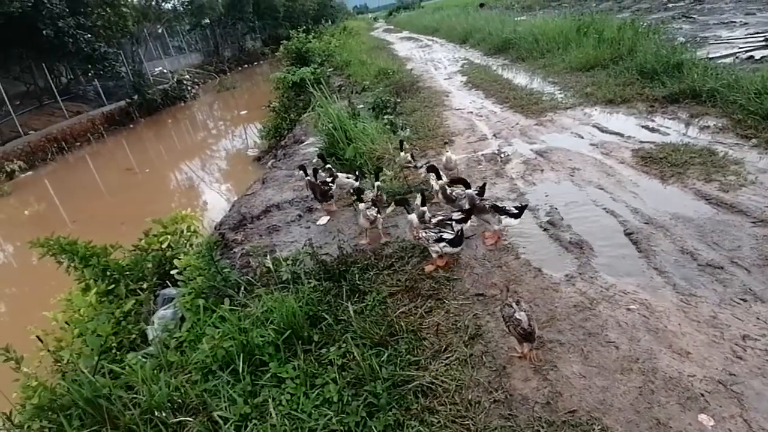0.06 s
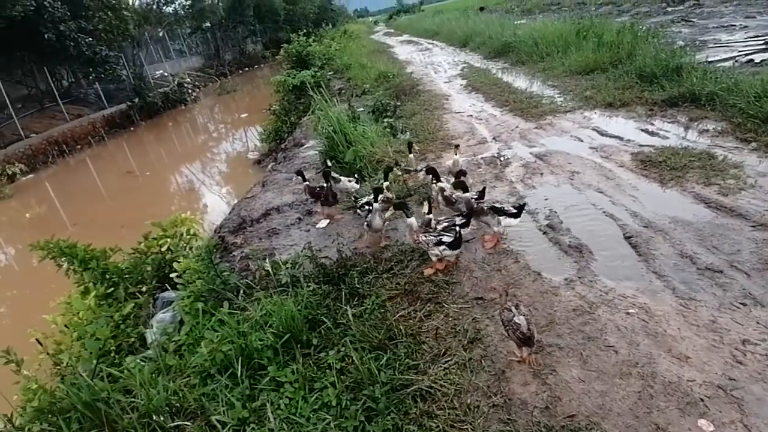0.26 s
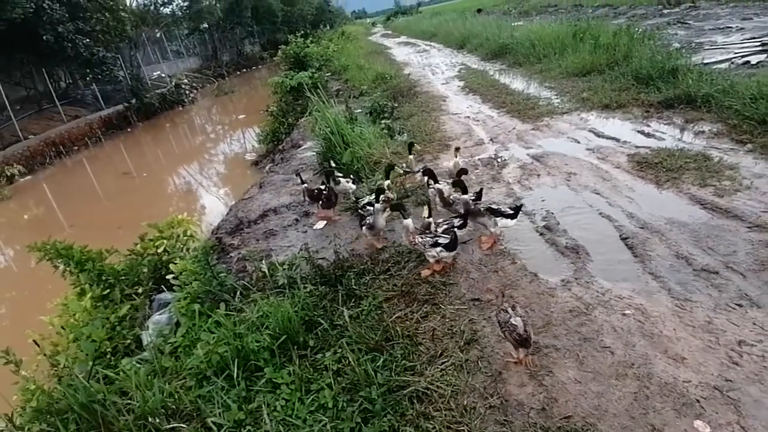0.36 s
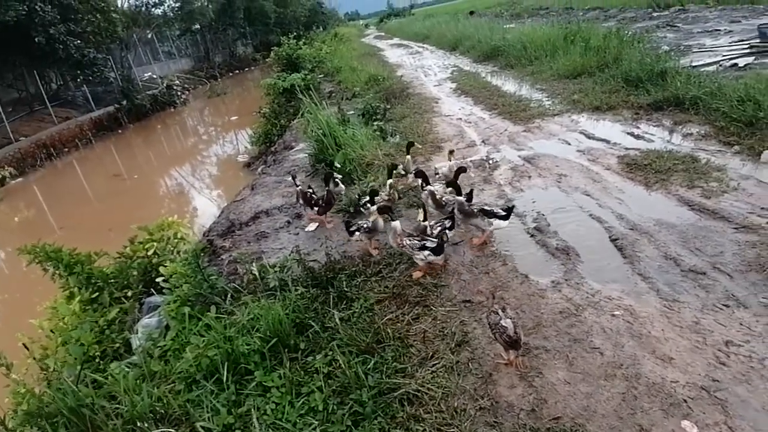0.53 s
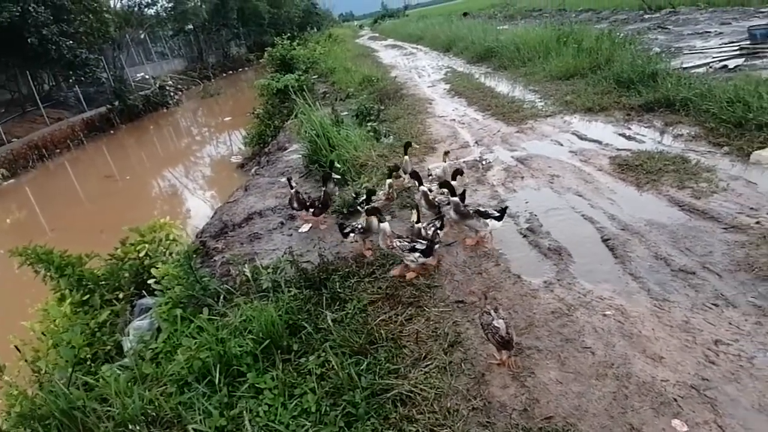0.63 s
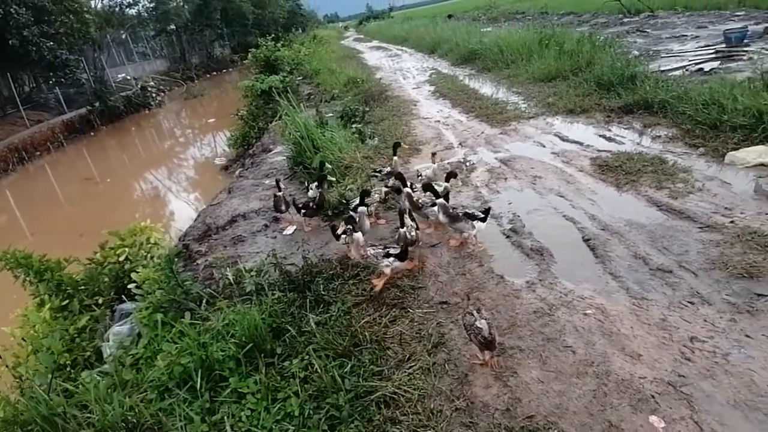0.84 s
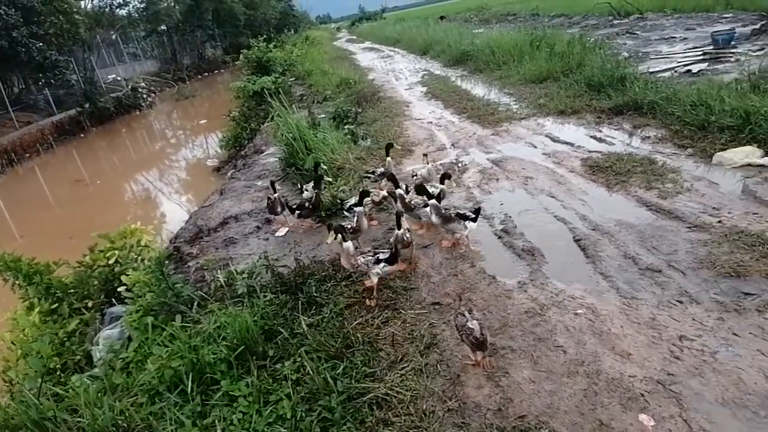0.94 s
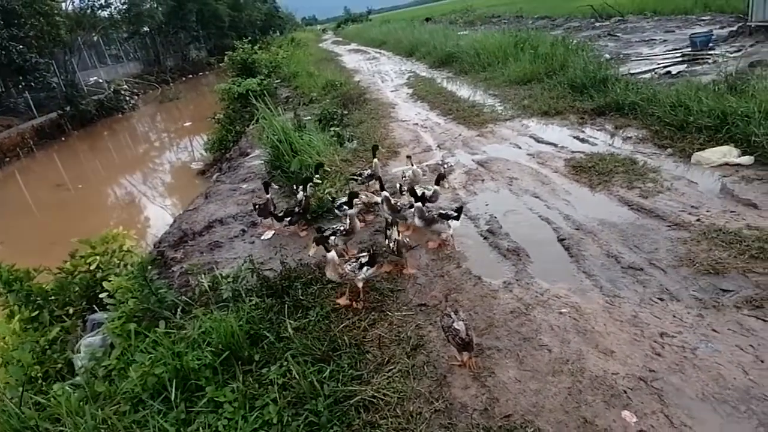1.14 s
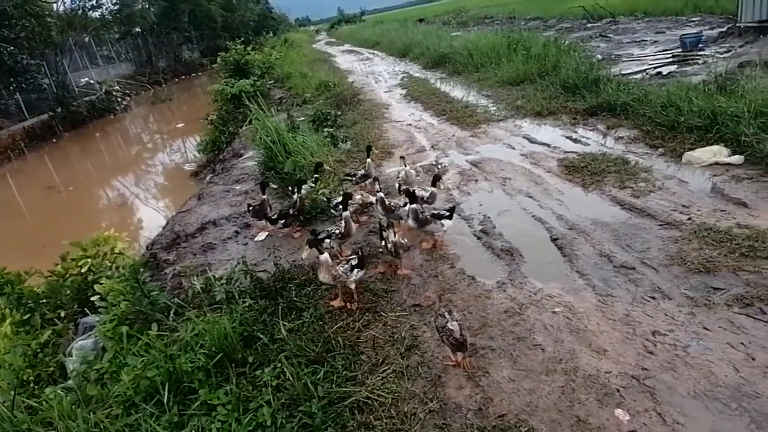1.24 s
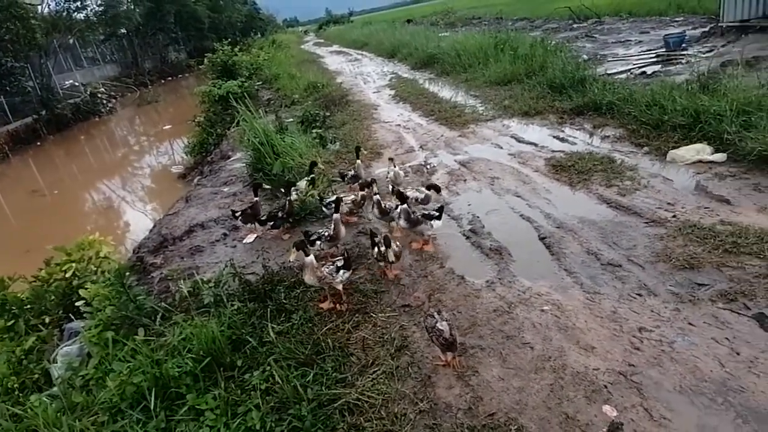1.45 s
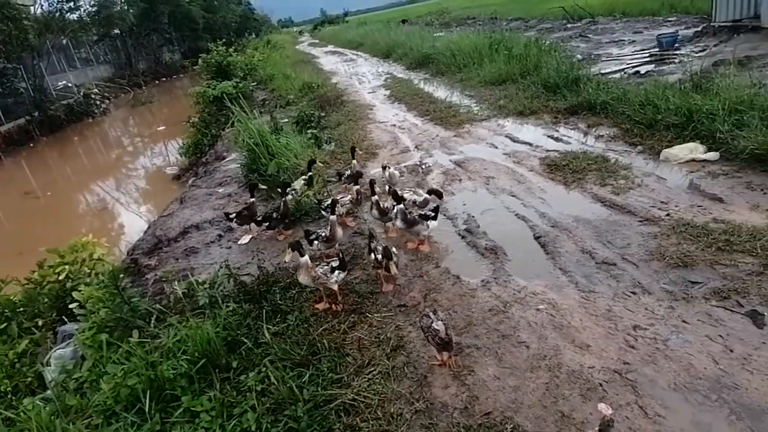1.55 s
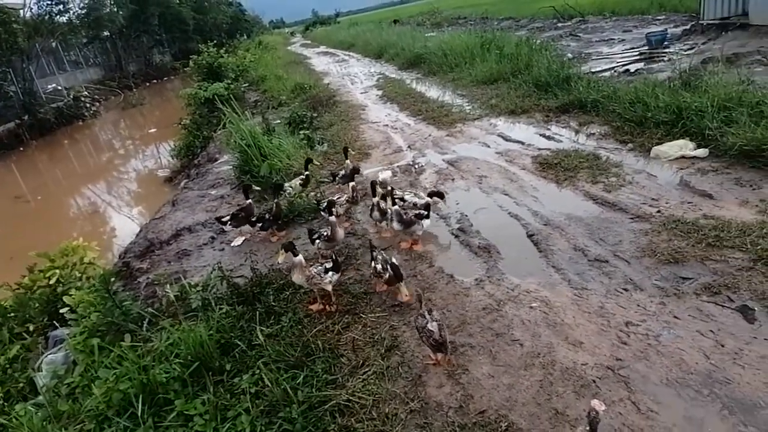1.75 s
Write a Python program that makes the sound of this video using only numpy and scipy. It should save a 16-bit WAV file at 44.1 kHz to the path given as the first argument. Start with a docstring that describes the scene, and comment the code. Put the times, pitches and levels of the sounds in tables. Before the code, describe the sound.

A nearby bird gives four falling whistles, the last three breaking into short reedy croaks. Before them, ducks rasp, quack softly and dabble in mud. Buzzy chirps, thin peeps and faint insects surround an open farm track.

```python
"""A farm track beside a channel: insects and thin peeps sound over soft air and a low rumble.
First ducks rasp and quack softly, their pulsing voices shaped by resonances, and dabble in the mud.
From 0.5 s a bird buzzes in trains of tiny chirps whose tone reaches the left ear first.
From 0.7 s a near bird on the right gives four falling whistles; the last three break into short,
reedy croaks. Two wheezy peeps close the scene. Ground, far bank and trees reflect the calls."""
import sys
import numpy as np
from scipy import signal
from scipy.fft import rfft, irfft
from scipy.io import wavfile
from scipy.ndimage import map_coordinates

SR = 44100
rng = np.random.default_rng(int(sys.argv[2]) if len(sys.argv) > 2 else 0)


def transcribe(signal):
    """Save signal, clipped to [-1, 1], as a 16-bit WAV file at the path in sys.argv[1]."""
    frames = np.atleast_2d(signal).T
    limited = np.clip(frames, -1, 1)
    pcm = np.round(limited * 32767).astype(np.int16)
    wavfile.write(sys.argv[1], SR, pcm)


N = 79380
T = np.arange(N) / SR
RIGHT_LEAD_S = 0.0003723  # a source on the right reaches the right ear this much sooner

# frequency response of the near bird's throat (frequency [Hz], gain [dB])
BIRD_THROAT = [(450, -38), (950, -16), (1200, -14), (1520, 2.5), (2000, -11), (3200, -12), (3700, -27),
               (4700, -20), (9000, -58)]


def undb(db):
    """Amplitude ratio of a level in decibels."""
    return 10 ** (np.asarray(db) / 20)


def unit(x):
    """Normalisation to rms 1."""
    return x / np.sqrt(np.mean(x ** 2) + 1e-20)


def noise():
    """White Gaussian noise."""
    return rng.standard_normal(N)


def response(hz, points):
    """Gain at hz of a curve of (frequency [Hz], gain [dB]), interpolated over log frequency."""
    f, db = np.array(points, float).T
    return undb(np.interp(np.log(hz + 1), np.log(f), db))


def colour(x, points):
    """Spectral shaping by a response curve; rms 1."""
    return unit(irfft(rfft(x) * response(np.fft.rfftfreq(N, 1 / SR), points), N))


def resonate(x, hz, width):
    """Two equal resonators in cascade; rms 1."""
    b, a = signal.iirpeak(min(hz, SR / 2 - 1), hz / width, fs=SR)
    return unit(signal.lfilter(b, a, signal.lfilter(b, a, x)))


def formant(hz, centre_hz, width_hz):
    """Gain at hz of a Lorentzian resonance peak."""
    return 1 / (1 + ((hz - centre_hz) / (width_hz / 2)) ** 2)


def walk(rate):
    """Smooth random modulation that changes about rate times a second; rms 1."""
    return unit(map_coordinates(noise(), [T * rate + 10], order=3, mode="wrap"))


def swell(start, length, rise, fall):
    """Envelope of attack, hold and release; rise and fall are shares of the length."""
    u = (T - start) / length
    return np.sin(np.pi / 2 * np.clip(np.minimum(u / rise, (1 - u) / fall), 0, 1))


def phase_of(hz):
    """Phase in radians, the time integral of frequency."""
    return 2 * np.pi * np.cumsum(hz) / SR


def place(x, pan_db, lag_s=0):
    """Interaural level and time differences: positive pan favours the left ear, positive lag delays it."""
    left = map_coordinates(x, [(T - lag_s) * SR], order=3)
    gains = undb(np.array([[pan_db], [-pan_db]]) / 2)
    return np.array([left, x]) * unit(gains)


def scatter(x, pan_db, spread_s=0.0018, direct=0.74):
    """Multipath propagation: sound reaches each ear through grass by many short paths."""
    t = T[:1024]
    paths = rng.standard_normal((2, len(t))) * np.exp(-t / spread_s)
    paths /= np.sqrt(np.sum(paths ** 2, axis=1, keepdims=True))
    paths[:, 0] += direct
    return signal.fftconvolve(place(x, pan_db), paths, axes=1)[:, :N] / np.hypot(1, direct)


def reflections(x, tail_t60_s=0.15):
    """Diffuse reflection adds scatter from the ground, an echo from the far bank and a tail from trees."""
    def cloud(delay_s, decay_s, db):
        paths = rng.standard_normal((2, N)) * (T >= delay_s) * np.exp(-np.abs(T - delay_s) / decay_s)
        return undb(db) * paths / np.sqrt(np.sum(paths ** 2, axis=1, keepdims=True))
    ground = cloud(delay_s=0.0045, decay_s=0.0045, db=-13)
    bank = cloud(delay_s=0.077, decay_s=0.029, db=-26)
    trees = cloud(delay_s=0.0045, decay_s=tail_t60_s / np.log(1000), db=-12)
    mono = x.mean(axis=0, keepdims=True)
    return x + signal.fftconvolve(mono, ground + bank + trees, axes=1)[:, :N]


def open_air(air_db=-54, rumble_db=-55, side_db=-13, coherent_below_hz=300):
    """Interaural coherence sets width: independent hiss is wide, shared rumble and murmur are central."""
    # spectra of the steady air and the rumble (frequency [Hz], relative density [dB])
    air_spectrum = [(20, -4.5), (133, 0.5), (491, -15), (649, -9), (1300, -22), (3080, -9), (3750, -22.5),
                    (5850, -20), (7310, -19.5), (9390, -19.5), (12000, -32.5), (15000, -34)]
    rumble_spectrum = [(20, -6.5), (65, 2.5), (125, -6.5), (200, -27), (310, -15.5), (1500, -55.5)]
    # envelope of the air's low murmur (time [s], level [dB])
    murmur_levels = [(0, -73), (.25, -61.5), (.8, -59), (.93, -69.5), (1.8, -71)]
    air = undb(air_db) * np.array([colour(noise(), air_spectrum) for _ in range(2)])
    low = signal.sosfiltfilt(signal.butter(2, coherent_below_hz, fs=SR, output="sos"), air)
    air = air - low + low[0]
    middle = colour(noise(), rumble_spectrum)
    side = undb(side_db) * colour(noise(), rumble_spectrum) * np.array([[1], [-1]])
    murmur = undb(np.interp(T, *np.array(murmur_levels).T)) * resonate(noise(), hz=330, width=540)
    return air + undb(rumble_db) * (middle + side) + murmur


def insect_chorus(waver_db=1.3):
    """Insects merge into bands of noise with slight random amplitude modulation."""
    # insect bands (centre [Hz], width [Hz], level [dB])
    bands = [(3245, 270, -63), (5930, 1850, -58)]
    out = 0
    for hz, width, db in bands:
        strength = undb(db + waver_db * walk(27.3))
        out = out + strength * np.array([resonate(noise(), hz, width) for _ in range(2)])
    return out


def insect_trills():
    """Narrow-band noise is heard as a pitch: one thin shrill comes and goes in the grass."""
    # trills (start [s], length [s], level [dB])
    trills = [(0, .8, -58), (1.11, .1, -56), (1.25, .33, -59)]
    strength = sum(undb(db) * swell(start, length, rise=0.092, fall=0.1) for start, length, db in trills)
    return scatter(resonate(noise(), hz=7430, width=330) * strength, pan_db=0)


def far_peeps(jitter=0.092):
    """Farther birds sing gliding tones; random frequency modulation makes some wheezy."""
    # notes (start [s], length [s], first pitch [Hz], last pitch [Hz], level [dB], roughness [-], pan [dB])
    notes = [(0.068, 0.082, 5995, 5890, -48, 0.4, -8), (0.207, 0.099, 1300, 1734, -52.5, 0.92, 31),
             (.264, 0.013, 1680, 1715, -40, 0.3, -37), (.316, .022, 5650, 5250, -52, .25, -8),
             (.337, .028, 4050, 3180, -42.5, .2, -10), (.369, .018, 5400, 4950, -48, .2, -10),
             (1.133, 0.2, 725, 696, -55.5, 0.2, 16), (1.548, 0.076, 5990, 5600, -51, 1.19, 14),
             (1.661, 0.11, 5920, 5580, -49, 1.17, 8)]
    out = 0
    for start, length, first_hz, last_hz, db, rough, pan in notes:
        glide = np.interp(T, [start, start + length], [first_hz, last_hz])
        tone = unit(np.sin(phase_of(glide * (1 + jitter * rough * walk(1500)))))
        out = out + place(tone * undb(db) * swell(start, length, rise=0.4, fall=0.44), pan)
    return out


def mud_taps(relative_width=0.39):
    """Impact excitation: each wet click is a burst of contact noise ringing one broad resonance."""
    # bills and feet in the mud (time [s], level [dB], centre [Hz], decay [s])
    contacts = [(.202, -43.5, 2640, 0.01), (.217, -24.5, 1160, 0.0021), (0.217, -42, 3060, 0.021),
                (0.7079, -20, 5900, 0.00023), (1.071, -51, 8900, 0.00078)]
    out = 0
    for t, db, hz, decay in contacts:
        burst = noise() * (T >= t) * np.exp(-np.abs(T - t) / decay)
        decay_rms = np.sqrt(decay * SR / 2 / N)  # of a unit exponential over the whole scene
        out = out + undb(db) * decay_rms * resonate(burst, hz, hz * relative_width)
    return place(out, pan_db=-4, lag_s=RIGHT_LEAD_S)


def reed(hz, jitter, air):
    """A vibrating valve chops airflow into uneven pulses, each followed by a puff of noise."""
    periods = np.cumsum(hz * (1 + jitter * walk(200))) / SR
    pulses = np.diff(np.floor(periods), prepend=0) * undb(0.6 * walk(159.5))
    puffs = noise() * np.exp(-(periods % 1) / 1.2)
    return unit(pulses) + air * unit(puffs)


def duck_rasps():
    """Source and filter: irregular, breathy pulses pass through the resonances of a duck's throat."""
    # rasps (start [s], length [s], pulse rate [Hz], level [dB], pan [dB])
    calls = [(-.02, 0.13, 257.6, -49, -11), (0.3, 0.25, 237.1, -39, -10), (0.693, 0.13, 246.3, -43, -5.5)]
    # response of the duck's throat (frequency [Hz], gain [dB])
    duck_throat = [(300, -42), (1450, -14), (1800, 0), (2220, 10), (2800, 0), (5300, -8), (7200, -18),
                   (9000, -45)]
    out = 0
    for start, length, hz, db, pan in calls:
        voice = colour(reed(hz, jitter=0.3, air=1.6), duck_throat)
        rasp = voice * undb(db) * swell(start, length, rise=0.24, fall=0.57)
        out = out + scatter(rasp, pan, spread_s=0.0055, direct=0.9)
    return out


def duck_quacks(closing_oct_per_s=15, jitter=0.22):
    """A falling formant darkens the harmonics of each soft quack as the bill closes."""
    # quacks (start [s], length [s], pulse rate [Hz], level [dB], initial mouth resonance [Hz])
    calls = [(0.188, 0.048, 290, -45, 1390), (0.502, 0.04, 228.4, -41, 1050)]
    out = 0
    for start, length, hz, db, open_hz in calls:
        mouth_hz = open_hz * 2 ** (-closing_oct_per_s * np.clip(T - start, 0, length))
        phase = phase_of(hz * (1 + jitter * walk(700)))
        voice = sum(formant(k * hz, mouth_hz, width_hz=520) * np.sin(k * phase + rng.uniform(0, 2 * np.pi))
                    for k in range(1, 14))
        out = out + unit(voice) * undb(db) * swell(start, length, rise=0.31, fall=0.46)
    return place(out, pan_db=-13, lag_s=RIGHT_LEAD_S)


def bird_buzzes(chirp_rate_hz=75, swing=0.099, fall_oct_per_s=0.33, jitter=0.06, flicker_db=2):
    """Sawtooth frequency modulation makes an uneven train of upward chirps, rich in overtones and hiss."""
    # notes (start [s], length [s], pitch [Hz], pan [dB], roughness [-], hiss [dB], partials 1-4 [dB])
    notes = [(.505, .22, 2150, -4, .35, -51, [-50, -45.5, -48, -58]),
             (.812, .135, 2235, -3.5, .15, -58, [-50, -41, -46, -66]),
             (.865, .17, 2080, -3, .8, -44, [-53, -47, -44, -51]),
             (.975, .15, 2050, -1.5, .3, -51, [-58, -48, -44, -58])]
    # spectrum of the hiss (frequency [Hz], relative density [dB])
    hiss_spectrum = [(1800, -17.5), (4200, -7), (4900, 0), (6000, 7), (6800, 3), (7700, 0), (9000, -30),
                     (12000, -35)]
    beat = (T * chirp_rate_hz + 0.13 * walk(55)) % 1  # runs from 0 to 1 in each chirp
    throb = (1 - 0.3 * np.cos(2 * np.pi * beat)) * undb(flicker_db / 2 * walk(79.7))
    out = 0
    for start, length, hz, pan, rough, hiss_db, partials_db in notes:
        pitch = hz * 2 ** (-fall_oct_per_s * np.clip(T - start, 0, length))
        phase = phase_of(pitch * (1 + swing * (beat - 0.5) + jitter * rough * walk(900)))
        voice = np.sqrt(2) * sum(undb(db + flicker_db * walk(89.3)) * np.sin(k * phase)
                                 for k, db in enumerate(partials_db, 1))
        hiss = undb(hiss_db) * colour(noise(), hiss_spectrum)
        envelope = swell(start, length, rise=0.22, fall=0.77) * throb
        out = out + place(voice * envelope, pan, lag_s=-0.000515) + scatter(hiss * envelope, pan)
    return out


def bird_croaks(jitter=0.05, flicker_db=7, attack_s=0.003, release_s=0.004):
    """A register break: the voice drops to a rough, reedy harmonic series that sags and dies away."""
    # one curve a croak (time [s], pitch [Hz], source level [dB], roughness [-], upper resonance [Hz])
    curves = [
        [(.999, 555, -39, 0.55, 2560), (1.017, 488, -36.5, 0.25, 2760), (1.031, 452, -36, 0, 2780),
         (1.046, 405, -53, 0.2, 2600)],
        [(1.225, 532, -44.5, .2, 2720), (1.237, 516, -26, 0.17, 2700), (1.25, 470, -35.5, 0.17, 2720),
         (1.273, 415, -49, 0.2, 2570)],
        [(1.492, 555, -31, 0.65, 2180), (1.511, 492, -32, 0.25, 2400), (1.522, 468, -39, 0.13, 2500),
         (1.534, 410, -44, 0.2, 2380)],
    ]
    out = 0
    for curve in curves:
        t, *columns = np.array(curve).T
        pitch, db, rough, upper_hz = (np.interp(T, t, column) for column in columns)
        phase = phase_of(pitch * (1 + jitter * rough * walk(700)))
        voice = 0
        for k in range(1, 13):
            upper = undb(-0.5) * formant(k * pitch, upper_hz, width_hz=200)
            throat = response(k * pitch, BIRD_THROAT) + upper
            flicker = undb(flicker_db * rough * walk(150))
            voice = voice + throat * flicker * np.sin(k * phase + rng.uniform(0, 2 * np.pi))
        breath = 0.5 * rough * colour(noise(), BIRD_THROAT)
        gate = np.clip(np.minimum((T - t[0]) / attack_s, (t[-1] - T) / release_s), 0, 1)
        out = out + undb(db) * gate * (voice + breath)
    return place(out, pan_db=-9, lag_s=RIGHT_LEAD_S)


def bird_whistles(waver=0.00734, flutter_db=1, octave_flicker_db=3.5, breath_db=-32):
    """A nearly sinusoidal oscillation sweeps down and swells; a hoarse second harmonic comes and goes."""
    # one curve a whistle (time [s], pitch [Hz], level [dB], octave level [dB])
    curves = [
        [(.694, 3900, -52, -68), (.713, 3480, -50, -68), (.719, 3180, -39, -66), (.733, 3050, -34, -62),
         (.741, 2850, -27.5, -58), (.752, 2520, -29.5, -54), (.762, 2440, -35, -58), (.773, 2250, -36.5, -60),
         (.781, 2050, -46, -66)],
        [(.925, 3886, -50, -41), (.94, 3585, -43, -62), (.957, 3234, -35, -59), (.971, 2965, -27.5, -67),
         (.981, 2922, -32, -64), (.987, 2550, -23, -41), (.995, 2390, -36, -53), (1.008, 1990, -36.5, -51)],
        [(1.142, 4730, -63, -72), (1.159, 4260, -36, -64), (1.173, 3860, -39.5, -56), (1.186, 3390, -37, -46),
         (1.195, 3037, -35.5, -54), (1.199, 2958, -30.5, -46), (1.207, 2854, -29, -53),
         (1.212, 2500, -23.5, -46), (1.221, 2330, -33.5, -43), (1.231, 2020, -39, -60)],
        [(1.38, 6034, -60, -85), (1.395, 4750, -61, -59), (1.412, 4460, -39, -52), (1.428, 4200, -40.5, -50.5),
         (1.44, 3955, -47.5, -33), (1.453, 3690, -36, -90), (1.471, 3200, -26.5, -40),
         (1.478, 2730, -29.5, -58), (1.487, 2370, -24.5, -47), (1.496, 2200, -29.5, -70)],
    ]
    out = 0
    for curve in curves:
        t, *columns = np.array(curve).T
        pitch, db, octave_db = (np.interp(T, t, column) for column in columns)
        phase = phase_of(pitch * (1 + waver * walk(500)))
        gate = swell(t[0], t[-1] - t[0], rise=0.023, fall=0.009) * undb(flutter_db * walk(250))
        octave_gain = undb(octave_db + octave_flicker_db * walk(150))
        octave = octave_gain * np.sin(2 * phase + 0.4 * walk(830))  # phase noise broadens the partial
        breath = undb(breath_db) * colour(noise(), BIRD_THROAT)
        out = out + np.sqrt(2) * gate * (undb(db) * (np.sin(phase) + breath) + octave)
    return place(out, pan_db=-5.5, lag_s=RIGHT_LEAD_S)


def scene():
    """Superposition: birds, ducks and their reflections add to the insects and the air."""
    birds = bird_whistles() + bird_croaks() + bird_buzzes() + far_peeps()
    ducks = duck_rasps() + duck_quacks() + mud_taps()
    return reflections(birds + ducks) + insect_trills() + insect_chorus() + open_air()


def record(dry):
    """Band limiting: a steep elliptic low-pass removes the treble above 15.5 kHz."""
    return signal.sosfilt(signal.ellip(8, 0.2, 70, 15500, fs=SR, output="sos"), dry)


dry = scene()
out = record(dry)
transcribe(out)
```